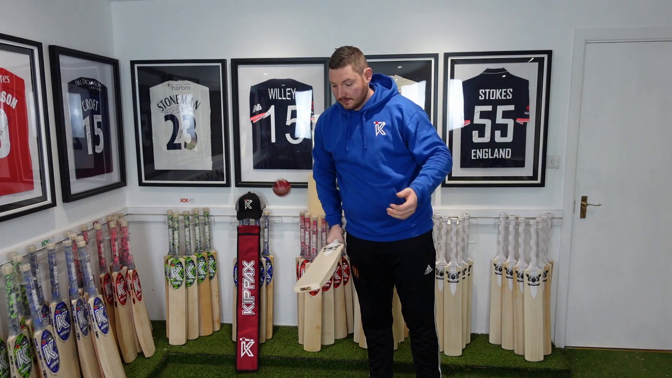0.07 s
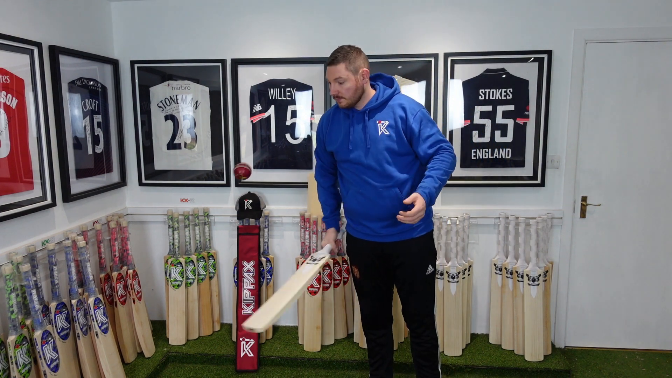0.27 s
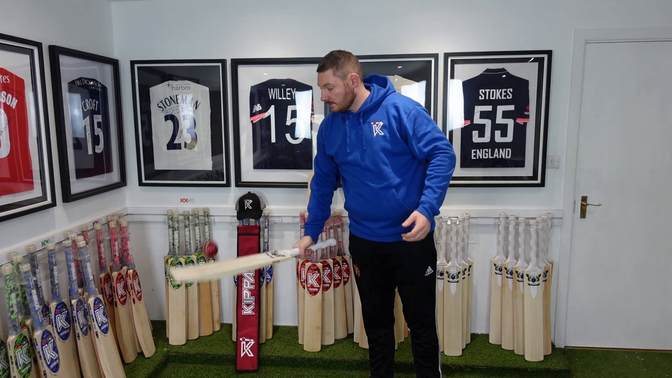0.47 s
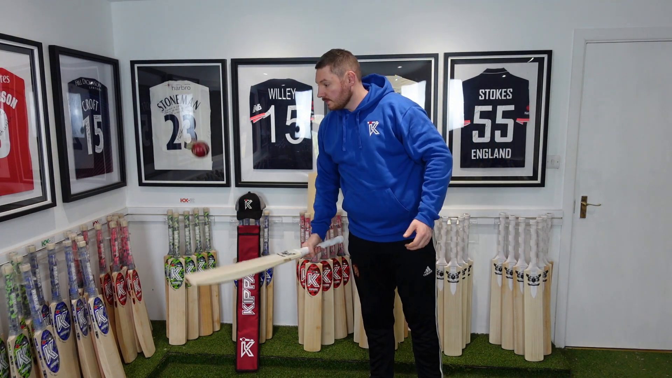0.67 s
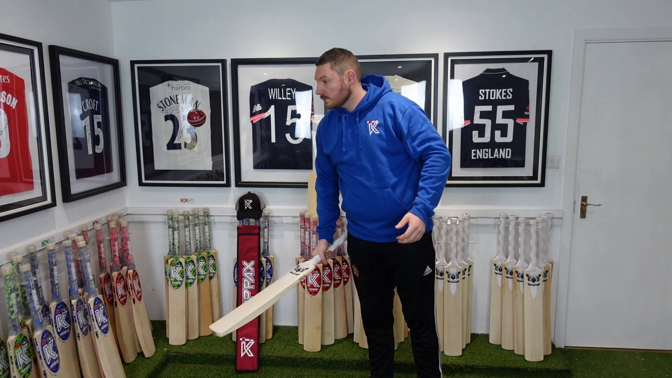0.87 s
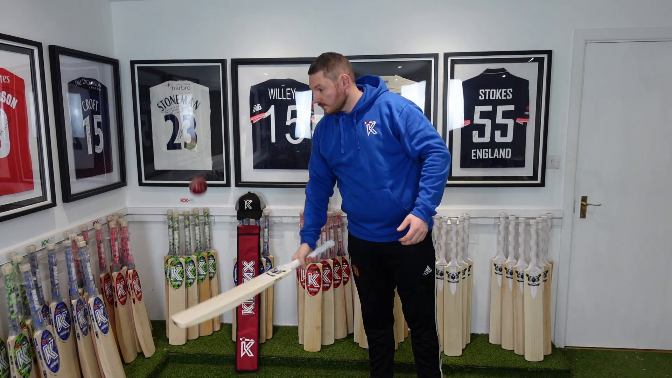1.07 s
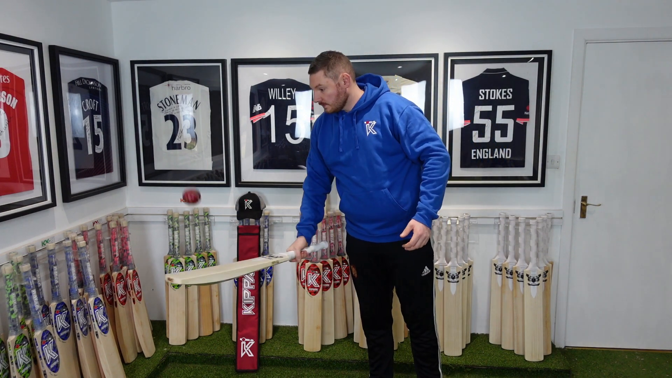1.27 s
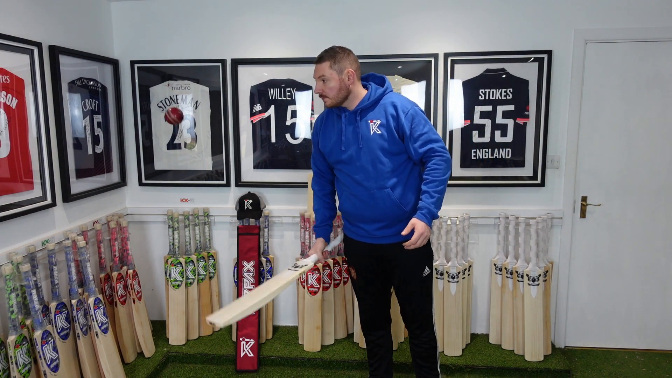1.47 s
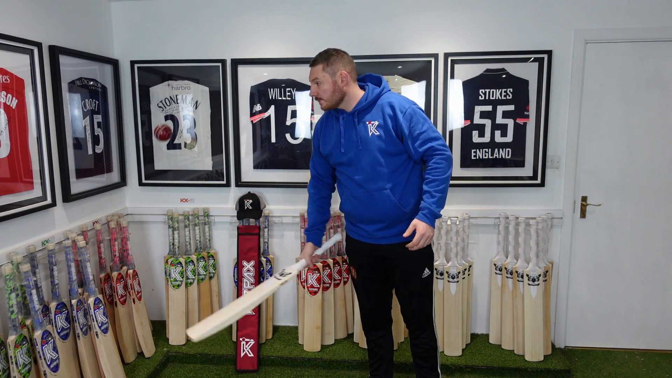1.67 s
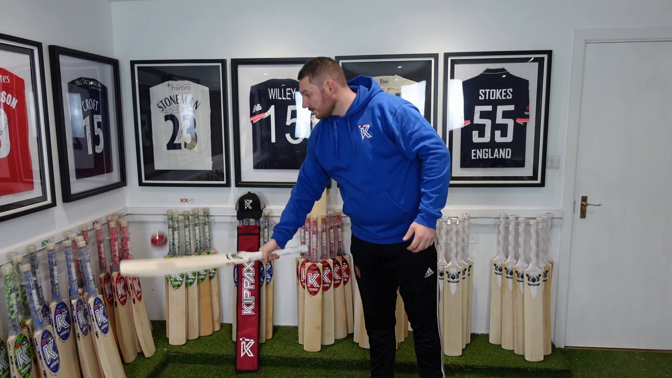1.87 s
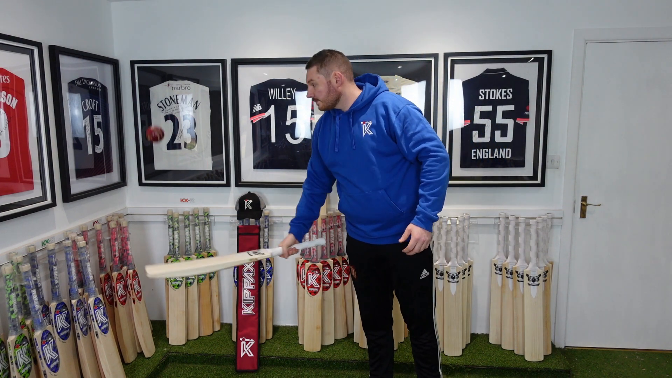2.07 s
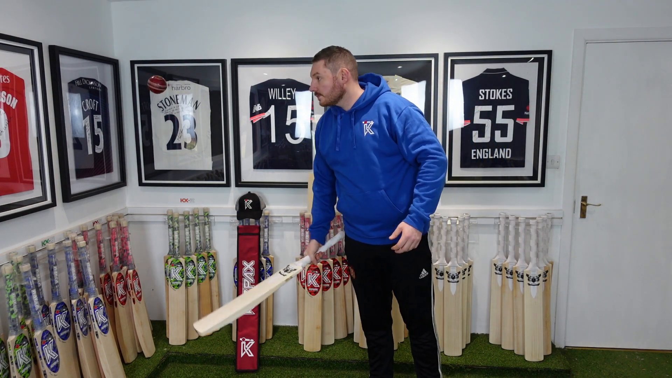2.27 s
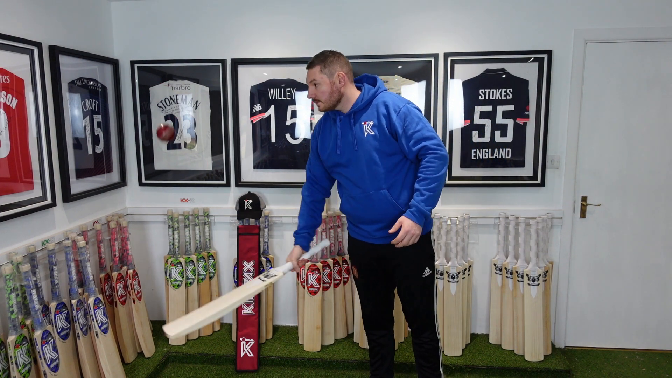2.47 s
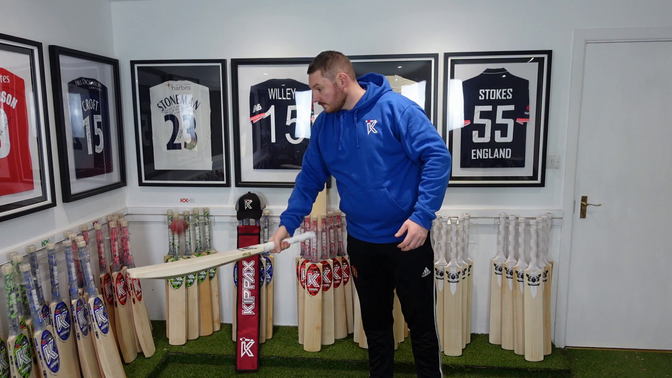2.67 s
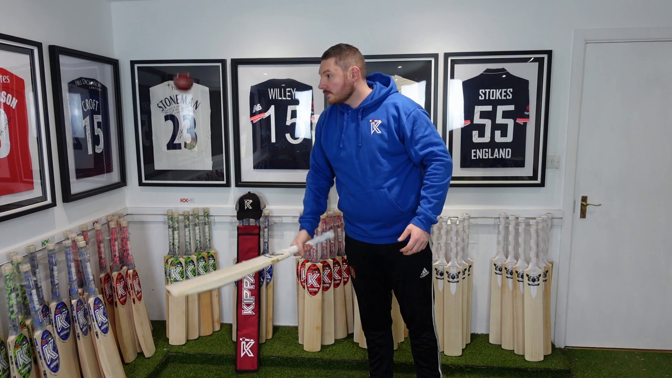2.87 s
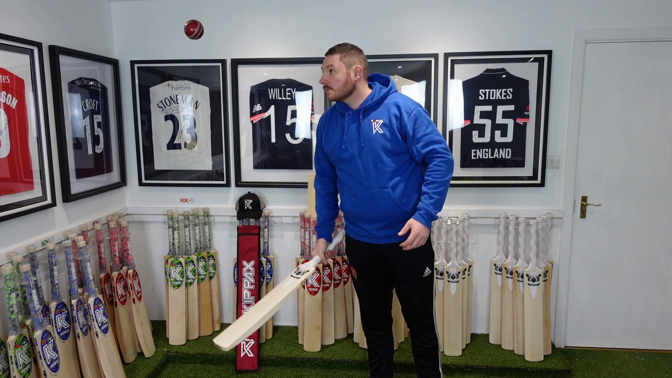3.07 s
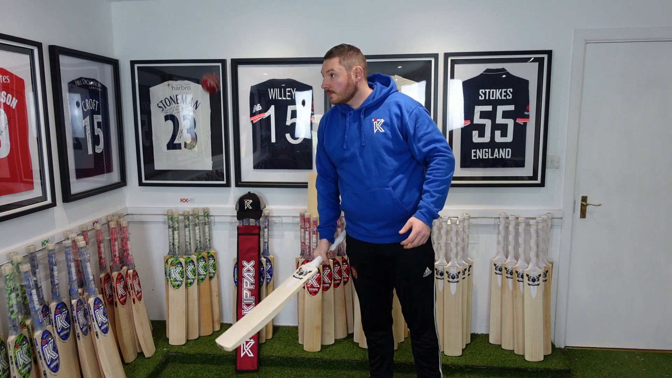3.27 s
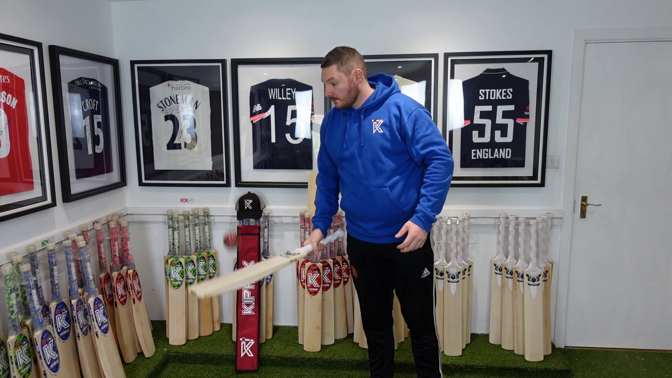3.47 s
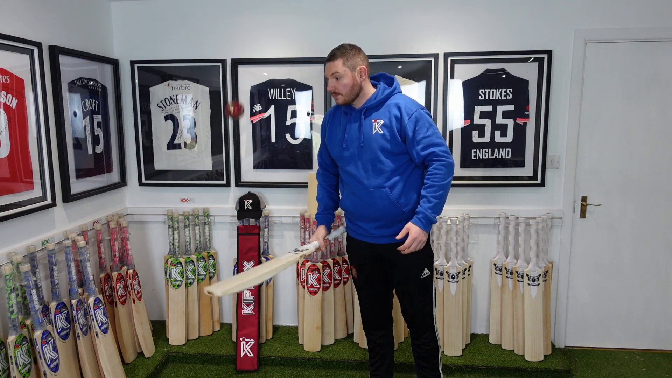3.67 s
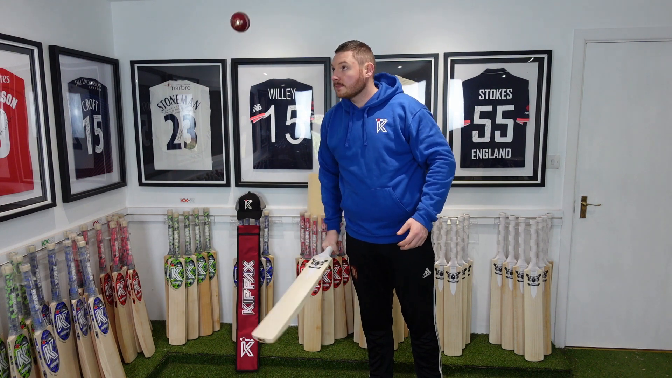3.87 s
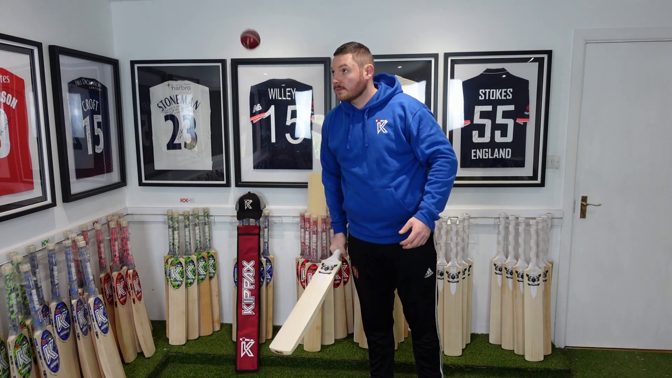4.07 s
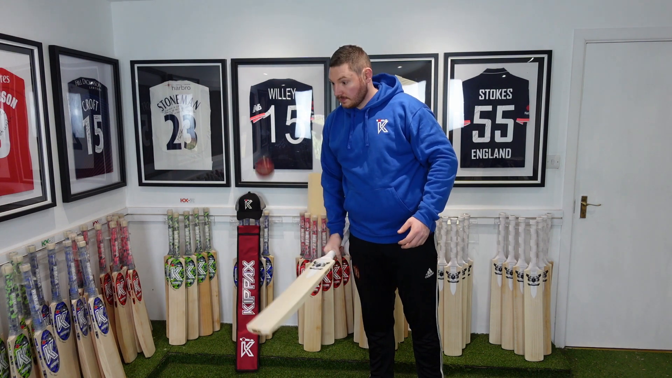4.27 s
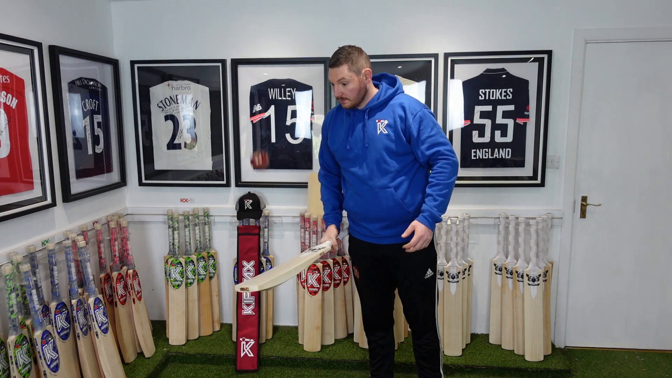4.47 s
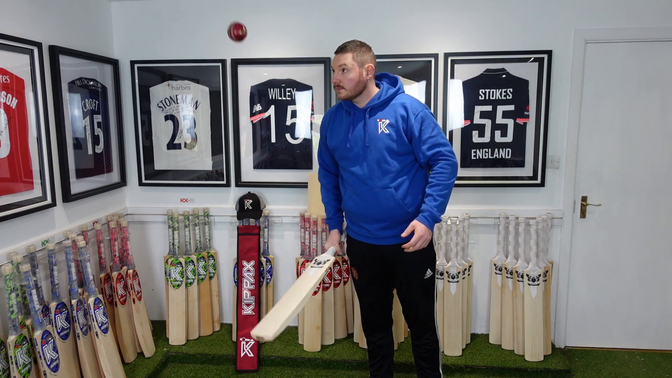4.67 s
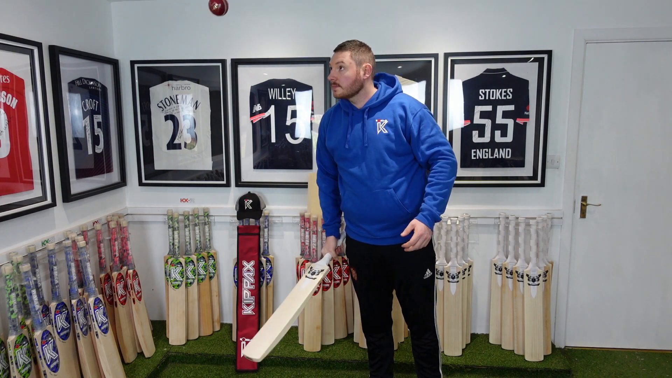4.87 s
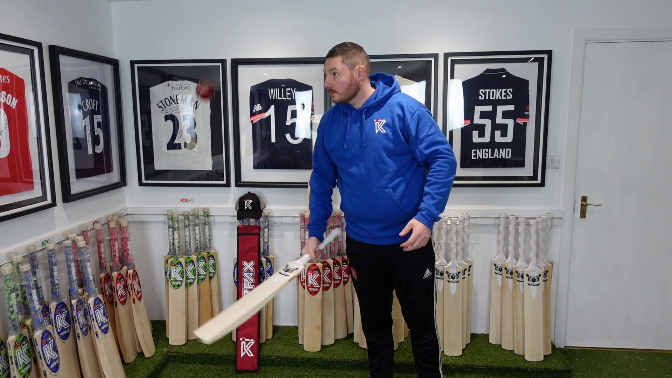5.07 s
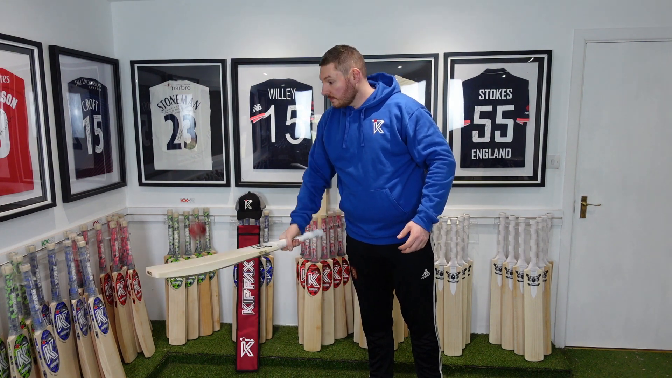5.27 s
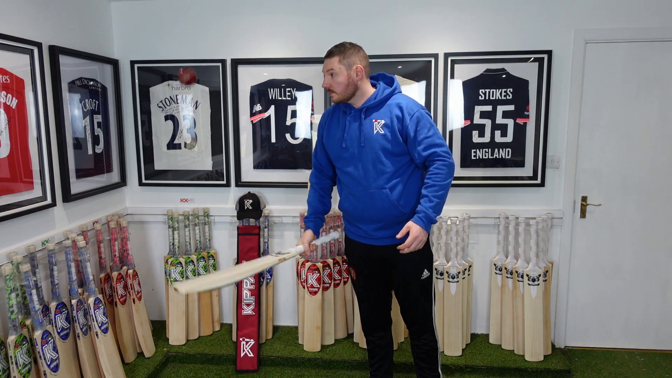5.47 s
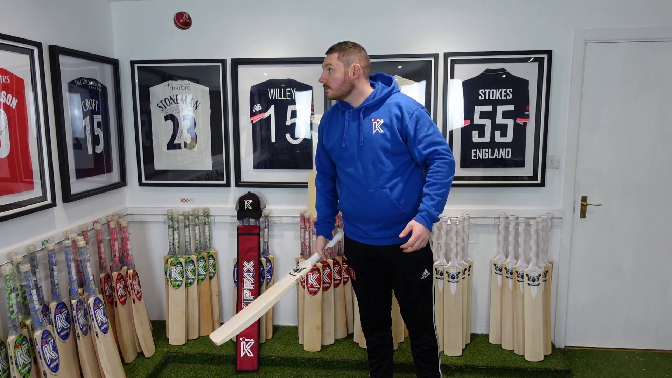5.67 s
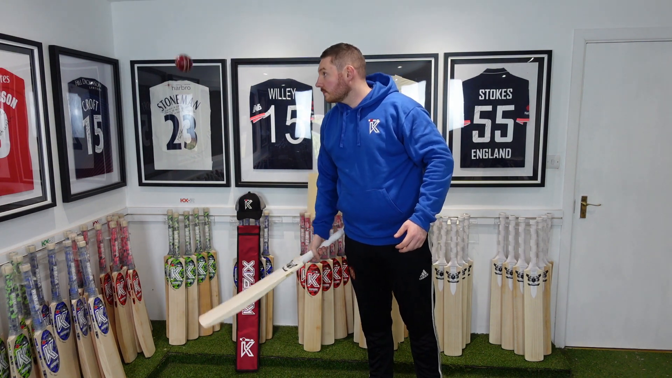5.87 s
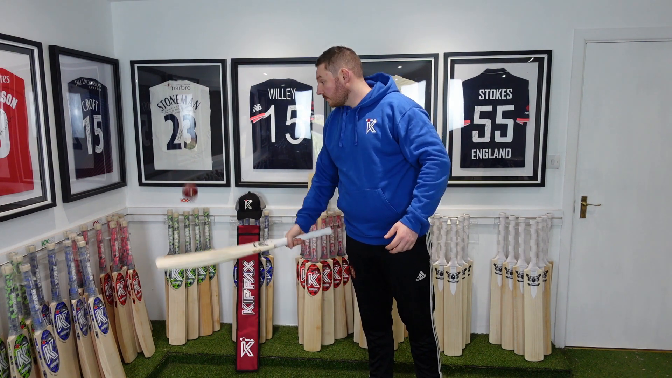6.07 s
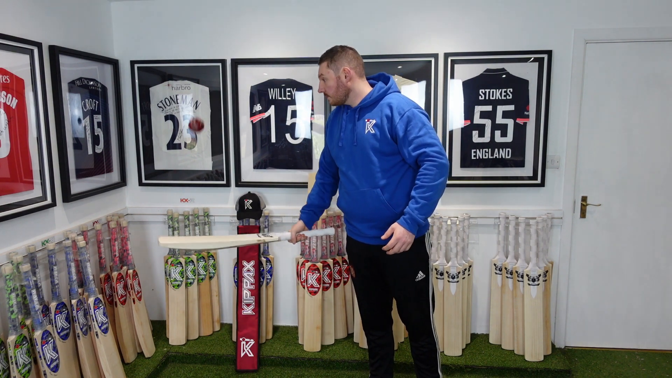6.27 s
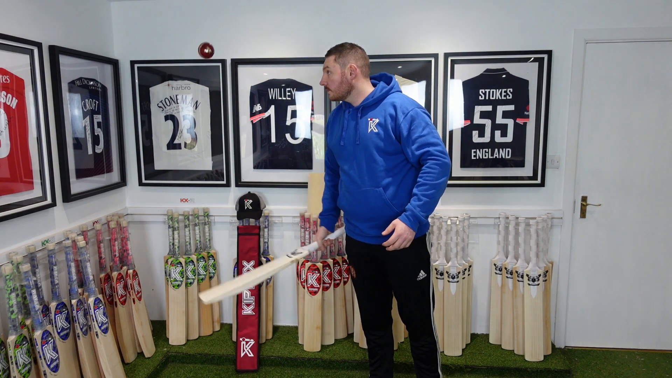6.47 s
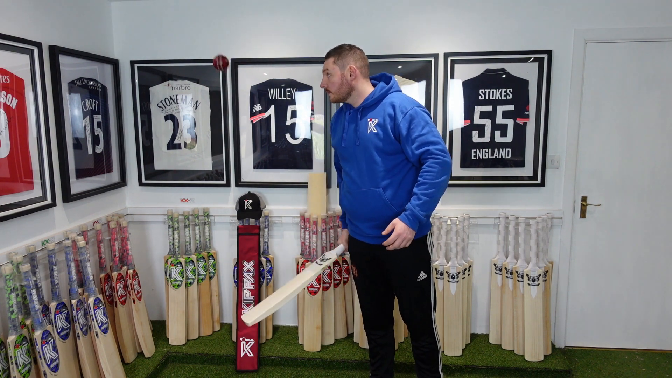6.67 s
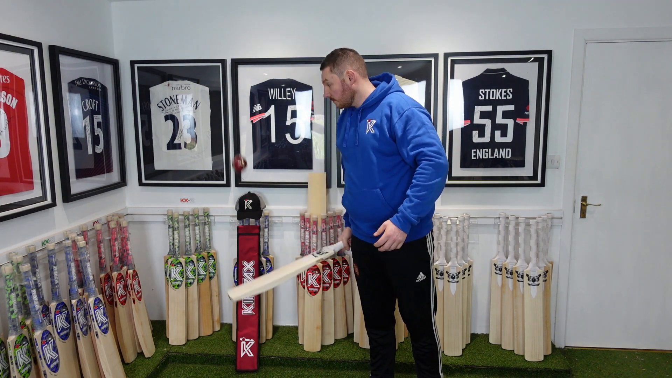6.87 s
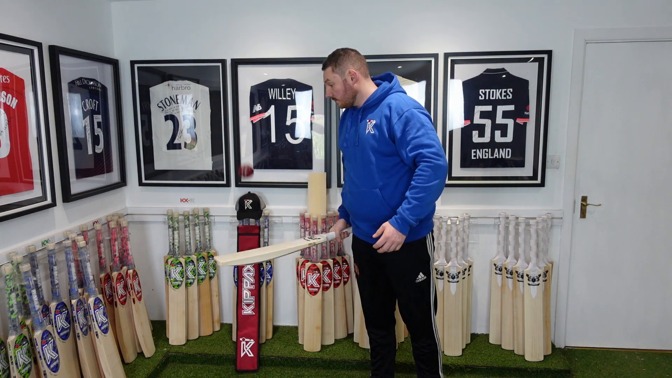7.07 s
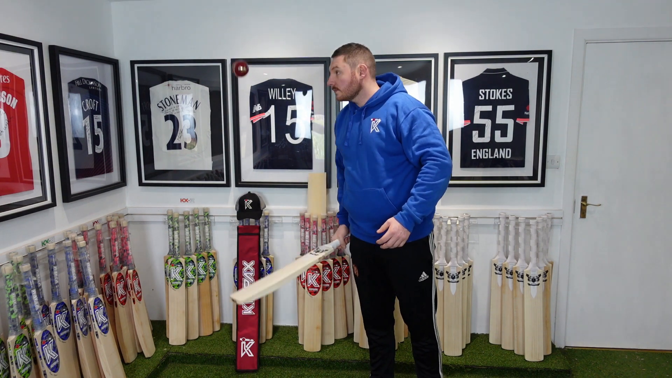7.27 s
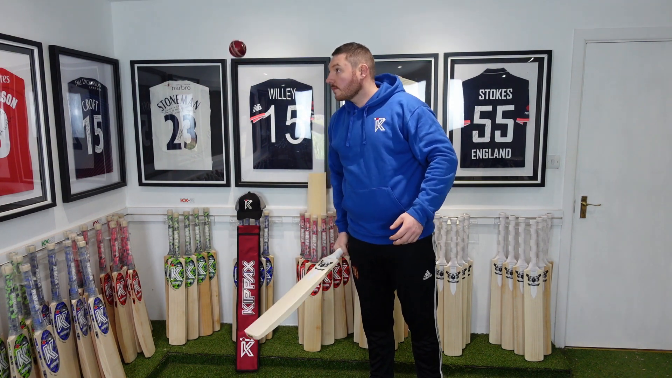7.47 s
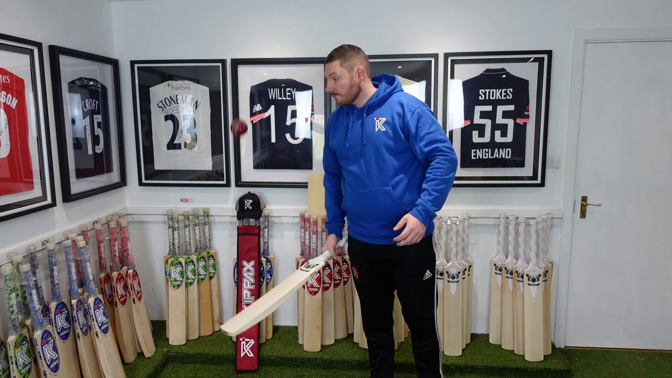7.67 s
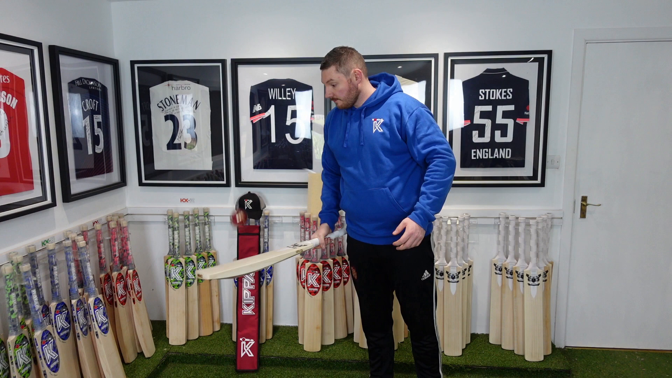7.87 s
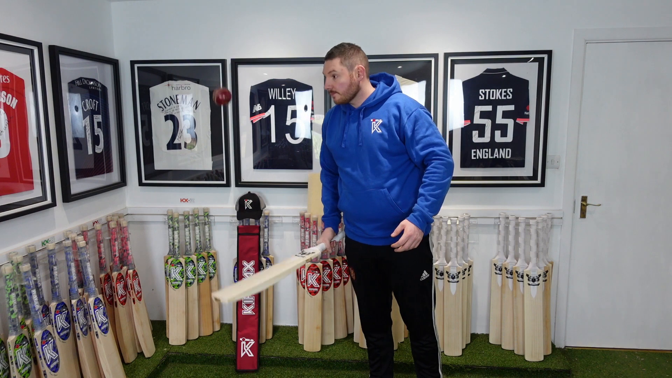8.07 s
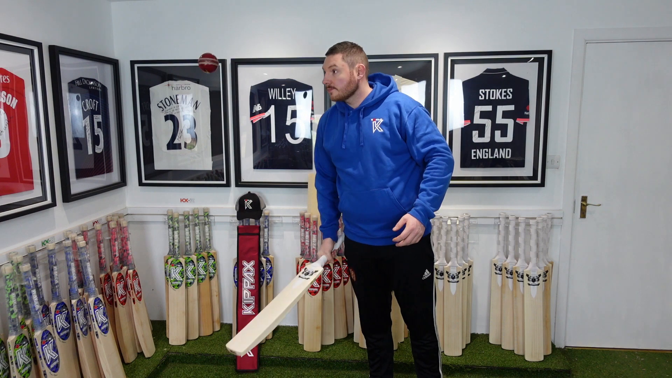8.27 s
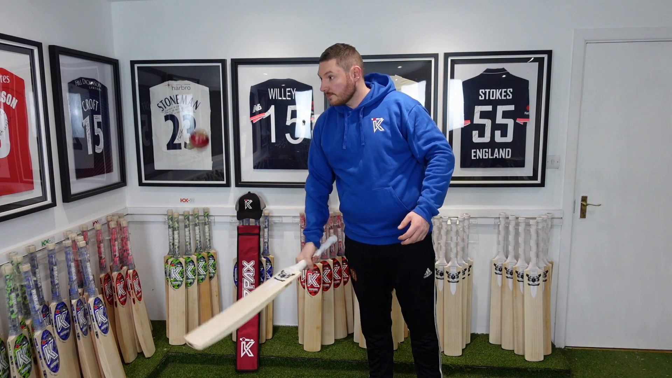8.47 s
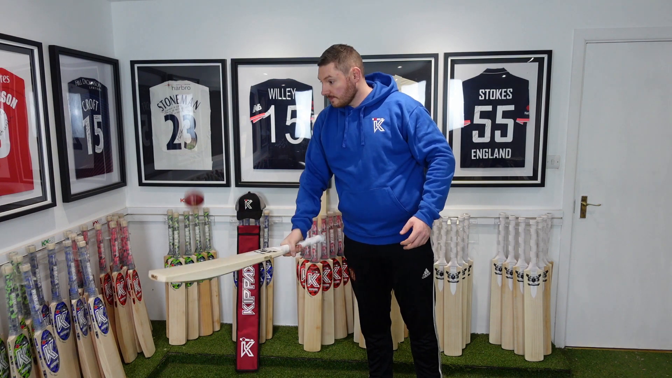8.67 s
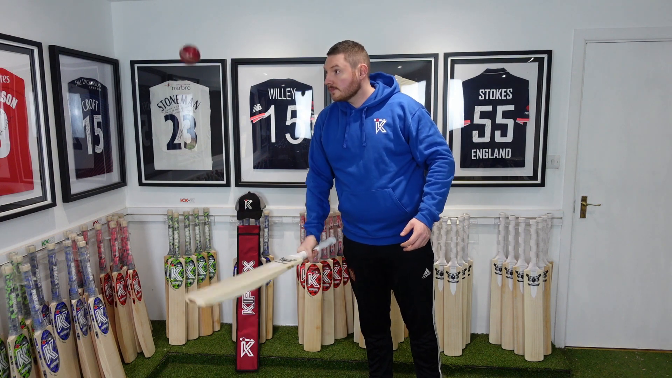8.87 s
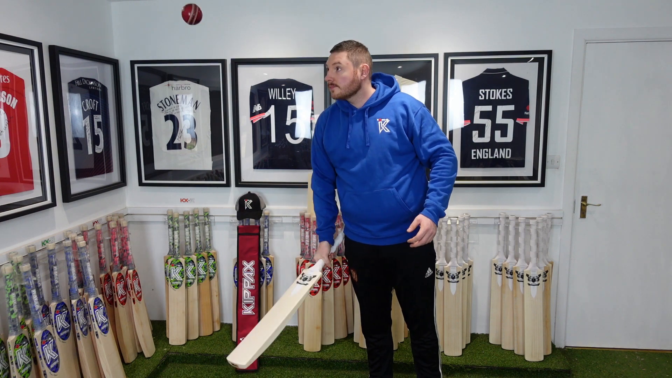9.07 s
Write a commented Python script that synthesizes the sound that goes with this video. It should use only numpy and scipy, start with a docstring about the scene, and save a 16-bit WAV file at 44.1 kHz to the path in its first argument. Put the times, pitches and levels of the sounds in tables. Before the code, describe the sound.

Sharp, hollow knocks of a leather ball on a wooden bat repeat from start to finish, a little more than once a second. Each one stands clear at the microphone, swells for an instant and rings away in a small room before the next. Underneath are only a very quiet rumble, an electrical hum and a few soft stirs of feet and sleeves, with two barely audible high squeaks late on.

```python
"""A small, hard-walled showroom, where a leather cricket ball is kept bouncing on a willow bat.
Each touch is a woody knock with a leather crack on top, and sets the bat and the room ringing.
Automatic gain control ducks at the blow and recovers as the echo dies, so every knock swells
for a moment before it fades. Feet and sleeves stir faintly over a low rumble and an electrical
hum, and a thin squeak sounds twice near the end."""
import sys
import numpy as np
from scipy import signal
from scipy.fft import rfft, irfft, next_fast_len
from scipy.io import wavfile
from scipy.ndimage import uniform_filter1d, minimum_filter1d

SR = 44100
rng = np.random.default_rng(int(sys.argv[2]) if len(sys.argv) > 2 else 0)


def to_wav(s):
    """Save 16-bit WAV."""
    ch = np.atleast_2d(s).T  # columns
    pcm = np.round(np.clip(ch, -1, 1) * 32767)  # PCM
    wavfile.write(sys.argv[1], SR, pcm.astype(np.int16))


N = 402633
EVENT_SIZE = SR   # samples given to one knock, stir or squeak, tail included


def from_db(db):
    """Decibels to gain."""
    return 10 ** (np.asarray(db) / 20)


def unit_rms(x):
    """Scale to an rms of 1."""
    return x / np.sqrt(np.mean(x ** 2) + 1e-20)


def bins(size):
    """Frequencies of a real FFT, in Hz."""
    return np.maximum(np.arange(size // 2 + 1) * SR / size, 1)


def at_hz(curve, hz):
    """Read a curve on a log-frequency axis."""
    knots, values = np.transpose(curve)
    return np.interp(np.log(hz), np.log(knots), values)


def add(track, sound, start_s):
    """Mix a stereo sound in at a time; what falls outside is dropped."""
    at = int(round(start_s * SR))
    first, last = max(at, 0), min(at + sound.shape[1], N)
    track[:, first:last] += sound[:, first - at:last - at]


def minimum_phase(gain):
    """A spectrum with these gains in which nothing sounds before the blow."""
    cepstrum = irfft(np.log(gain + 1e-9))
    half = len(cepstrum) // 2
    fold = np.r_[1, np.full(half - 1, 2), 1, np.zeros(half - 1)]
    return np.exp(rfft(cepstrum * fold))


# Stereo width of diffuse sound: freq_hz, side_over_mid_db
WIDTH = [(100, -32), (250, -20), (500, -14), (1000, -11), (2000, -8.5), (4000, -6), (7000, -11),
         (14000, -12)]

def diffuse(white):
    """Left and right spectra from two noises: alike in the bass, wider in the treble."""
    mid, side = rfft(white)
    width = from_db(at_hz(WIDTH, bins(white.shape[1])))
    return mid + side * width * np.array([[1], [-1]])


def blade_colour_db(hz, spacing_hz=170, uneven=0.36, peak_hz=3680, half_width_hz=210, peak_db=1.5):
    """Each spot on the blade wakes its own mix of short wood resonances; one peak is common to all."""
    knots = np.arange(0, SR / 2, spacing_hz)
    real, imaginary = rng.standard_normal((2, len(knots)))
    mix = 1 + uneven * np.interp(hz, knots, real + 1j * imaginary)   # neighbours add up or cancel
    common_peak = peak_db / (1 + ((hz - peak_hz) / half_width_hz) ** 2)
    return 20 * np.log10(np.abs(mix)) + common_peak


# The woody body of the knock, at hardness 1: freq_hz, level_db
KNOCK_SPECTRUM = [(30, -30), (100, -21), (200, -11.5), (290, -6.5), (420, -1), (720, 2), (1020, 1.5),
                  (1200, -3), (1420, -6), (1650, -20), (2200, -22), (5000, -63.5)]
# The crack of hard leather on wood, on the same scale: freq_hz, level_db
CRACK_SPECTRUM = [(500, -51), (1800, -19.5), (2700, -19), (3600, -17.5), (4700, -21), (7500, -25.5),
                  (10000, -30), (13000, -41.5), (16000, -47.5)]

def contact(hardness, crack_db, tilt_db_per_octave, pivot_hz=4500):
    """Spectrum of one touch: about a millisecond on the blade keeps the knock dull; harder is higher."""
    hz = bins(EVENT_SIZE)
    knock = from_db(at_hz(KNOCK_SPECTRUM, hz / hardness))
    tilt_db = tilt_db_per_octave * np.log2(np.maximum(hz / pivot_hz, .5))
    crack = from_db(at_hz(CRACK_SPECTRUM, hz) + crack_db + tilt_db + blade_colour_db(hz))
    return minimum_phase(unit_rms(np.hypot(knock, crack)))


# The direct sound and the first slaps off the walls: delay_s, level_over_tail_db
ARRIVALS = [(0, 11.5), (0.0023, 18), (0.0058, 16), (0.01, 13)]
# The length of the reverb tail, band by band: freq_hz, t60_s
ROOM_DECAY = [(100, 0.35), (300, 0.55), (700, 0.5), (1300, 0.46), (2500, 0.41), (5000, 0.38), (9000, 0.3),
              (15000, 0.235)]

def room_response(white, gap_s=0.0028, thin_share=0.43, fill_s=0.033):
    """Hard walls return a few distinct arrivals, then echoes that thicken and whose treble dies first."""
    t, spectrum = np.arange(EVENT_SIZE) / SR, diffuse(white)
    knots, t60s = np.transpose(ROOM_DECAY)
    response, log_hz = np.zeros((2, EVENT_SIZE)), np.log(bins(EVENT_SIZE))
    for band, t60_s in zip(np.eye(len(knots)), t60s):
        weight = np.interp(log_hz, np.log(knots), band)
        response += irfft(spectrum * weight, EVENT_SIZE) * from_db(-60 * t / t60_s)
    onset = np.clip(t / gap_s - .5, 0, 1) ** 2
    thickening = 1 - thin_share * np.exp(-(t / fill_s) ** 2)
    response *= onset * thickening
    bright_click = np.array([1, -.8])   # short paths lose less treble than the dense echoes
    for delay_s, level_db in ARRIVALS:
        at = int(delay_s * SR)
        response[:, at:at + 2] += from_db(level_db) * bright_click
    return response


# The ring after a blow, from the bat's bending and the room's standing waves: pitch_hz, level_db, t60_s
RING_MODES = [ (79, -45, 1.1), (152, -36, 0.95), (254, -17, 0.58), (300.5, -16.5, 0.78), (322.3, -13, 0.77),
              (339, -17.5, 0.72), (380, -21, 0.65), (410, -19, 0.62), (450.3, -13, 0.7), (468, -16, 0.62),
              (522, -16, 0.48), (597, -20, 0.64), (616, -16, 0.55), (668, -16, 0.52), (678, -7, 0.67),
              (724, -14, 0.5), (746, -19, 0.58), (823, -20, 0.62), (908, -19, 0.54), (1033, -19, 0.5)]

def ringing(phase_cycles, scatter_db=1.5, build_s=0.0057, spread_rad=0.098):
    """The modes build up quickly and die away; their strengths vary with where the ball lands."""
    t = np.arange(EVENT_SIZE) / SR
    pitch_hz, level_db, t60_s = np.transpose(RING_MODES)[:, :, None]
    strength, skew, slip = rng.standard_normal((3, len(pitch_hz), 1))
    envelopes = from_db(level_db + scatter_db * strength - 60 * t / t60_s)
    modes = envelopes * np.exp(2j * np.pi * (pitch_hz * t + phase_cycles + slip / 10))
    # higher modes reach left and right more out of step
    apart_rad = spread_rad * skew * pitch_hz / pitch_hz.mean()
    channels = [(modes * np.exp(1j * side * apart_rad)).imag.sum(axis=0) for side in (1, -1)]
    build_up = 1 - np.exp(-(t / build_s) ** 2)
    return np.array(channels) * build_up


# Ball-on-bat hits; hardness multiplies the knock's pitch:
# start_s, level_db, hardness, crack_db, crack_tilt_db_per_octave
BOUNCES = [ (-0.018, -4.5, 0.97, 0.5, 1), (0.5702, -5, 1.11, -2.5, 1.5), (1.2646, -5.5, 0.89, -1, -1),
           (1.9732, -6, 1.1, -1.5, -0.5), (2.7272, -5.5, 0.98, -2, -0.5), (3.5775, -4.5, 1.036, -2.5, 5),
           (4.4510, -4.5, 1.073, -1, 3), (5.3366, -5, 1, 1, 2.5), (6.2054, -7, 0.95, -4.5, 4),
           (7.0592, -5, 1.076, -4, 0.5), (7.912, -6.5, 0.93, -3, 3.5), (8.6963, -5, 0.97, -3, -2.5)]

def bounces(repeat_share=0.36, ring_db=-1.0):
    """Every knock through the room; the bat moves a little, so only part of the echo pattern repeats."""
    out = np.zeros((2, N))
    pattern = rng.standard_normal((2, EVENT_SIZE))
    phase_cycles = rng.random((len(RING_MODES), 1))
    for start_s, level_db, hardness, crack_db, tilt in BOUNCES:
        fresh = rng.standard_normal((2, EVENT_SIZE))
        room = room_response(np.sqrt(repeat_share) * pattern + np.sqrt(1 - repeat_share) * fresh)
        knock = irfft(rfft(room) * contact(hardness, crack_db, tilt), EVENT_SIZE)
        ring = from_db(ring_db) * ringing(phase_cycles)
        add(out, from_db(level_db) * (knock + ring), start_s)
    return out


# The bed of still air under everything: freq_hz, level_db
AIR_SPECTRUM = [(25, -29), (40, -16), (62, -11), (85, 1), (120, 1), (200, -2), (320, -4), (500, -10),
                (750, -12), (1000, -16), (1700, -19), (2500, -26), (5000, -32), (16000, -41)]

def room_tone(level_db=-65.0):
    """A low, steady rumble with a trace of hiss."""
    size = next_fast_len(N)
    colour = from_db(at_hz(AIR_SPECTRUM, bins(size)))
    air = irfft(diffuse(rng.standard_normal((2, size))) * colour, size)
    return from_db(level_db) * unit_rms(air[:, :N])


def hum(pitch_hz=101, level_db=-74):
    """A faint electrical hum on one pure tone."""
    return from_db(level_db) * unit_rms(np.sin(2 * np.pi * pitch_hz * np.arange(N) / SR))


# Foot shuffles and sleeve rustles: peak_s, half_length_s, level_db, centre_hz, half_width_octaves
STIRS = [ (1.936, 0.097, -60, 2050, 1.8), (3.542, 0.05, -50, 432, 0.53), (5.138, 0.022, -65.5, 1500, 1.45),
         (5.173, 0.18, -61.5, 290, 0.85), (6.11, 0.06, -62, 417, 1.36)]

def stirs(lead_s=0.5):
    """Soft swells of friction noise as the player shifts stance."""
    out, t = np.zeros((2, N)), np.arange(EVENT_SIZE) / SR - lead_s
    for peak_s, half_length_s, level_db, centre_hz, octaves in STIRS:
        colour = np.exp(-(np.log2(bins(EVENT_SIZE) / centre_hz) / octaves) ** 2)
        noise = diffuse(rng.standard_normal((2, EVENT_SIZE)))
        rub = unit_rms(irfft(noise * colour, EVENT_SIZE))
        swell = np.exp(-(t / half_length_s) ** 2)
        add(out, from_db(level_db) * rub * swell, peak_s - lead_s)
    return out


# Thin, high squeaks somewhere in the room: start_s, length_s, pitch_hz, level_db
SQUEAKS = [(7.803, 0.12, 5530, -63.5), (8.058, 0.32, 5110, -60.5)]

def squeaks(rise_hz_per_s=195, waver_hz=40, fade_s=0.012):
    """A wavering tone that creeps upward; its own echoes make it flutter."""
    out, t = np.zeros((2, N)), np.arange(EVENT_SIZE) / SR
    room = rfft(room_response(rng.standard_normal((2, EVENT_SIZE))))
    for start_s, length_s, pitch_hz, level_db in SQUEAKS:
        waver = unit_rms(uniform_filter1d(rng.standard_normal(EVENT_SIZE), size=400))
        glide_hz = pitch_hz + rise_hz_per_s * t + waver_hz * waver
        gate = np.clip(np.minimum(t, length_s - t) / fade_s, 0, 1)
        tone = gate * np.sin(2 * np.pi * np.cumsum(glide_hz) / SR)
        echoed = irfft(rfft(tone) * room, EVENT_SIZE)
        add(out, from_db(level_db) * unit_rms(echoed) * np.sqrt(gate.mean()), start_s)
    return out


def scene():
    """Knocks up front; small movements, the still room and the squeaks far behind."""
    return bounces() + stirs() + room_tone() + hum() + squeaks()


def gain_control(x, threshold_db=-16.5, knee_db=1.5, duck_db_per_db=1.45, release_db_per_s=155.5):
    """Ducks just ahead of a loud sound, by more than its excess, and recovers as the held level falls."""
    ahead = SR // 140   # about 7 ms of look-ahead
    power = uniform_filter1d(np.mean(x ** 2, axis=0), 2 * ahead)
    level_db = 10 * np.log10(np.maximum(power, 1e-12))
    ramp_db = release_db_per_s * np.arange(N) / SR
    held_db = np.maximum.accumulate(level_db + ramp_db) - ramp_db   # each peak falls at the release rate
    excess_db = knee_db * np.logaddexp(0, (held_db - threshold_db) / knee_db)
    duck_db = minimum_filter1d(-duck_db_per_db * excess_db, 2 * ahead)
    return x * from_db(uniform_filter1d(duck_db, ahead))


def record(dry, output_db=0.44, stopband_hz=16600):
    """Gain control pumps the knocks, then a steep low-pass trims the very top."""
    low_pass = signal.cheby2(16, 70, stopband_hz, fs=SR, output="sos")
    return signal.sosfilt(low_pass, from_db(output_db) * gain_control(dry))


dry = scene()
out = record(dry)
to_wav(out)
```